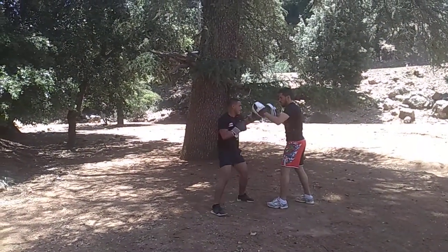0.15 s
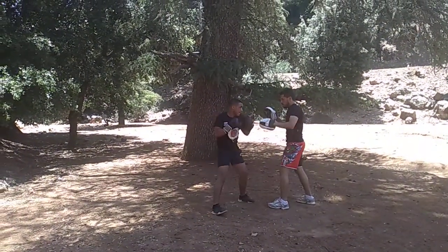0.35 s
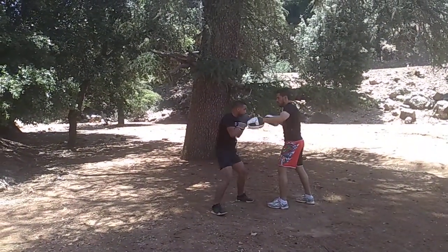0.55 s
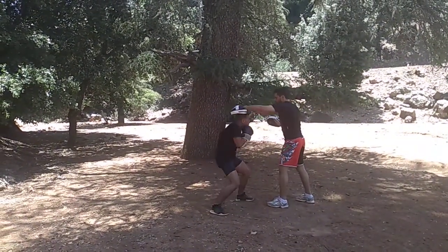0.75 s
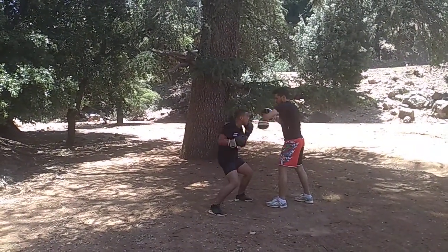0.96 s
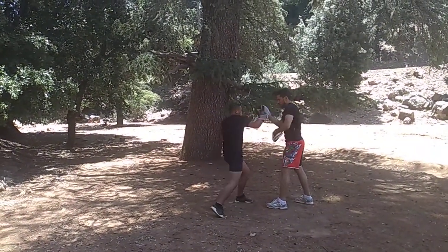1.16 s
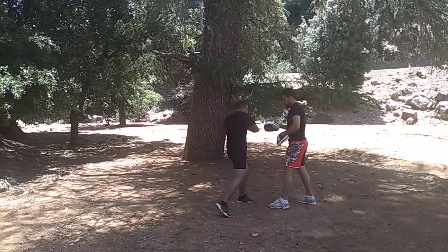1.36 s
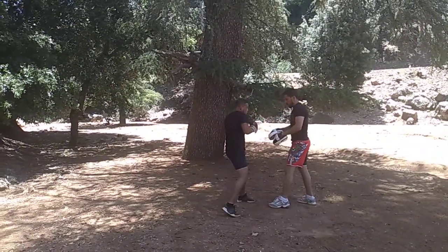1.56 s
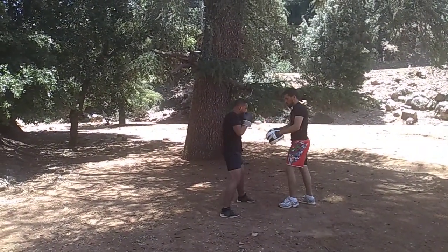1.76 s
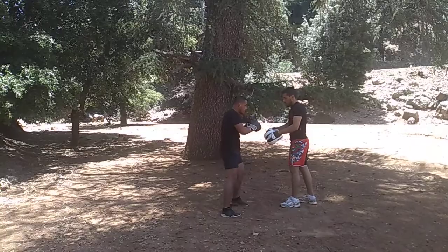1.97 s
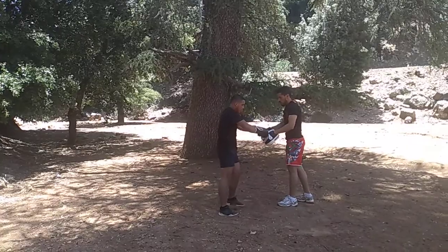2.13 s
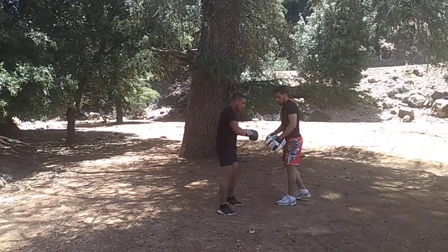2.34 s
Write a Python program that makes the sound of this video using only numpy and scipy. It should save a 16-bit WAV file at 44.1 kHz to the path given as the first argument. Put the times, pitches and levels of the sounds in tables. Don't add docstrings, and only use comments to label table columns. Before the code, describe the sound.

Boxing gloves smack padded mitts outdoors, sharp leather cracks with dull thumps echoing among trees

```python
import sys
import numpy as np
from scipy import signal
from scipy.fft import rfft, irfft, next_fast_len
from scipy.io import wavfile
from scipy.ndimage import uniform_filter1d, map_coordinates

SR = 44100
rng = np.random.default_rng(int(sys.argv[2]) if len(sys.argv) > 2 else 0)


def wrap_up_sound(samples):
    columns = np.atleast_2d(samples).T
    tamed = np.clip(columns, -1, 1)
    steps = np.round(tamed * 32767).astype(np.int16)
    wavfile.write(sys.argv[1], SR, steps)


def decibels_to_gain(level_db):
    exponent = np.asarray(level_db, float) / 20
    return 10 ** exponent


N = 105840


def unit(x):
    return x / np.sqrt(np.mean(x ** 2) + 1e-20)


def along(points, hz):
    f, v = np.transpose(points)
    return np.interp(np.log(hz + 1), np.log(f + 1), v)


def wobble(rate):
    knots = rng.standard_normal(int(N * rate / SR) + 4)
    return map_coordinates(knots, [np.arange(N) * rate / SR])


def filtered(x, response):
    m = next_fast_len(len(x) + SR // 2)
    return irfft(rfft(x, m) * response(np.fft.rfftfreq(m, 1 / SR)), m)[:len(x)]


def click(at):
    return 1. * (np.arange(SR) == at)


def coloured(size, gain_db):
    return unit(filtered(rng.standard_normal(size), lambda hz: decibels_to_gain(gain_db(hz))))


def add(track, s, sound):
    i = round(s * SR)
    part = track[max(i, 0):][:len(sound) + min(i, 0)]
    part += sound[max(-i, 0):][:len(part)]


def patchy(x, depth_db):
    z = signal.stft(x, nperseg=512)[2]
    field = uniform_filter1d(rng.standard_normal(z.shape), size=2, axis=0)
    field = uniform_filter1d(field, size=20, axis=1)
    return signal.istft(z * decibels_to_gain(depth_db * unit(field)), nperseg=512)[1][:len(x)]


def knock(modes):
    def ring(f):
        total = 0
        for k, (c, w, db) in enumerate(modes):
            total = total + (-1) ** k * decibels_to_gain(db) * 1j * f * w / (c * c - f * f + 1j * f * w)
        return total
    return -filtered(click(0), ring)


# f/Hz, time to fall 60 dB t/s
WOOD_T60 = [(100, 0.47), (300, 0.55), (1000, 0.58), (3000, 0.57), (8000, 0.24), (14000, 0.3)]
# f/Hz, level/dB
WOOD_TONE = [(80, 13.5), (300, -11), (1500, -3.5), (4000, -7.5), (8500, 6), (14000, -1.5)]
WOOD_RISE_S = 0.013
LATE_DB, LATE_LONGER, LATE_BASS_DB, LATE_BASS_HZ = -31, 3.4, 8.5, 180


def wood(x):
    hz, t, z = signal.stft(rng.standard_normal(len(x)), SR, nperseg=256)
    fall_db = -60 * t / along(WOOD_T60, hz)[:, None]
    late_db = LATE_DB + LATE_BASS_DB / (1 + (hz[:, None] / LATE_BASS_HZ) ** 4)
    near_and_far = decibels_to_gain(fall_db) + decibels_to_gain(late_db + fall_db / LATE_LONGER)
    z = z * decibels_to_gain(along(WOOD_TONE, hz))[:, None] * near_and_far
    tail = signal.istft(z, SR, nperseg=256)[1][:len(x)]
    tail = tail * (1 - np.exp(-(np.arange(len(tail)) / SR / WOOD_RISE_S) ** 2))
    return signal.fftconvolve(x, tail / np.linalg.norm(tail))[:len(x)]


# f/Hz, width/Hz, share lost
SOIL_DIPS = [(1120, 220, 0.6), (3040, 190, 0.71), (620, 92, 0.48)]


def soil(x):
    def dips(hz):
        gain = np.ones(len(hz))
        for centre, width, share in SOIL_DIPS:
            gain *= 1 - share * np.exp(-((hz - centre) / width) ** 2)
        return gain
    return filtered(x, dips)


# f/Hz, level/dB per Hz
RUSTLE = [(40, -19), (120, -11.5), (400, -15.5), (1200, -4.5), (2200, 3.5), (4500, -11.5), (6500, -26.5),
          (12500, -36.5)]
RUSTLE_DB, RUSTLE_TOP_HZ = -70.5, 12700
INSECT_HZ, INSECT_WIDTH_HZ, INSECT_DB = 9250, 800, -79


def air():
    far = coloured(N, lambda hz: along(RUSTLE, hz) - 25 * (hz > RUSTLE_TOP_HZ))
    hiss = coloured(N, lambda hz: np.maximum(-6 * ((hz - INSECT_HZ) / INSECT_WIDTH_HZ) ** 2, -60))
    rustle = decibels_to_gain(RUSTLE_DB + 0.78 * wobble(2.8)) * far
    insects = decibels_to_gain(INSECT_DB + wobble(8)) * hiss
    return patchy(rustle + insects, 3)


# t/s, length/s, first f/Hz, last f/Hz, level/dB
BIRD_NOTES = [(.743, .052, 2090, 2050, -62), (.763, .048, 6280, 6200, -65), (.84, .04, 3450, 2600, -72),
              (1.018, .14, 5800, 5400, -66), (1.168, .072, 6050, 5450, -64), (1.08, .16, 9250, 9250, -72),
              (1.12, .08, 9700, 9680, -76), (1.308, .04, 1860, 1820, -64), (1.35, .045, 3600, 2950, -66),
              (1.45, .055, 3400, 3620, -67), (1.65, .14, 2330, 2200, -67), (1.596, .078, 5780, 5000, -61),
              (1.712, .072, 5950, 5050, -61), (2.0, .04, 2020, 1900, -63), (2.178, .045, 2080, 2200, -60),
              (2.225, .035, 4000, 3200, -68), (2.258, .044, 2880, 2820, -67),
              (2.238, .028, 1850, 1600, -68)]
BEND, FADE_DB, NOTE_EDGE = 1.2, -7, .45
QUAVER_HZ, QUAVER_DB, HUSK = 30, 2, .3
BIRD_WET_DB = -5


def birds():
    out, quaver = np.zeros(N), wobble(120)
    for s, length, first_hz, last_hz, db in BIRD_NOTES:
        u = np.arange(round(length * SR)) / (length * SR)
        glide_hz = first_hz + (last_hz - first_hz) * u ** BEND
        hz = glide_hz + QUAVER_HZ * quaver[round(s * SR):][:len(u)]
        whistle = np.sin(2 * np.pi * np.cumsum(hz) / SR)
        add(out, s, decibels_to_gain(db + 7 + FADE_DB * u) * np.sin(np.pi * u) ** NOTE_EDGE * whistle)
    out *= decibels_to_gain(QUAVER_DB * wobble(70)) * (1 + HUSK * wobble(830))
    return out + decibels_to_gain(BIRD_WET_DB) * wood(out)


# f/Hz, level/dB per Hz
LITTER = [(200, -49.5), (450, -24), (870, -6.5), (1150, -14.5), (1500, -7), (2300, -8.5), (3000, -12.5),
          (4800, -7)]
OVER_TOP_DB, FABRIC_HZ, FABRIC_DB = -24, 11600, 6.5


def litter_db(hz, tilt_db, top_hz):
    swish_db = FABRIC_DB * np.exp(-((hz - FABRIC_HZ) / 900) ** 2)
    swish_db = swish_db - 4 * np.maximum(hz - FABRIC_HZ, 0) / 1000
    above_top = 1 / (1 + (top_hz / (hz + 1)) ** 24)
    return along(LITTER, hz) + tilt_db * np.log2(hz / 2500 + 0.15) + (OVER_TOP_DB + swish_db) * above_top


# t/s, length/s, level/dB, brightness/dB an octave, top f/Hz
SCUFFS = [(0.0, .11, -50.5, -1, 10600), (0.102, .11, -57, -4, 6850), (0.397, 0.17, -65, -7.5, 5500),
          (0.576, 0.19, -66.5, -4.5, 5800), (0.805, 0.054, -60, 1, 8650), (0.809, .12, -68.5, -5.5, 6160),
          (0.861, 0.14, -68, 3.5, 3770), (1.095, 0.068, -65, 2.5, 5880), (1.383, 0.16, -66, -1, 6100),
          (1.496, 0.077, -59, -3.5, 6030), (1.69, 0.25, -65, -3, 2895), (1.75, 0.19, -59.5, 1, 6270),
          (1.8, 0.11, -67, -1, 14300), (1.969, 0.16, -63, -4, 6100), (2.13, 0.24, -71.5, 2, 5000)]
SCUFF_ATTACK, SCUFF_RELEASE, SCUFF_SPAN = 0.19, 1, 2.5
GRIT_SHARE, GRIT_PER_S = 0.32, 1300
# t/s, peak level/dB
TWIGS = [
    (0.0954, -29),
    (0.8086, -38.5),
    (1.1006, -49),
    (1.1474, -49.5),
    (1.1608, -73.5),
    (1.5219, -43),
    (2.0219, -43),
    (2.149, -47),
    (2.2006, -62),
]
TWIG_DB, TWIG_T60_S, TWIG_TOP_HZ = -12, .04, 6000


def feet():
    out = np.zeros(N)
    for s, length, db, tilt_db, top_hz in SCUFFS:
        size = round(length * SR * SCUFF_SPAN)
        u = np.arange(size) / SR / length
        grit = (rng.random(size) < GRIT_PER_S / SR) * rng.standard_normal(size)
        drag = GRIT_SHARE * unit(grit) + (1 - GRIT_SHARE) * rng.standard_normal(size)
        drag = unit(filtered(drag, lambda hz: decibels_to_gain(litter_db(hz, tilt_db, top_hz))))
        release = np.exp(-(np.maximum(u - .6, 0) / SCUFF_RELEASE) ** 2 * 3)
        add(out, s, decibels_to_gain(db) * np.clip(u / SCUFF_ATTACK, 0, 1) * release * drag)
    out = patchy(out, 4) * decibels_to_gain(0.77 * wobble(25))
    t = np.arange(SR // 10) / SR
    for s, db in TWIGS:
        tick = coloured(len(t), lambda hz: litter_db(hz, 1.7, TWIG_TOP_HZ))
        add(out, s, decibels_to_gain(db + TWIG_DB - 60 * t / TWIG_T60_S) * tick)
    return out


# f/Hz, width/Hz, level/dB
ARM = [(75, 30, 1.5), (118, 100, 3), (179, 81, 2.5)]
# t/s, level/dB
PUSHES = [
    (-.045, 11.5),
    (.234, 20.5),
    (1.2412, 14),
]
ARM_WET_DB = -13


def arms():
    out, thud = np.zeros(N), knock(ARM)
    for s, db in PUSHES:
        add(out, s, decibels_to_gain(db) * (thud + decibels_to_gain(ARM_WET_DB) * wood(thud)))
    return out


# t/s, crack level/dB, crack length/s, thump level/dB, cup ring level/dB
CONTACTS = [
    (-.045, -22.5, 0.0074, -13.5, -35),
    (0.2338, -8, 0.0012, -12.5, -31.5),
    (.2352, -18.5, 0.0051, -38.5, -10),
    (1.2392, -41, .0015, -35, -60),
    (1.2413, -24, 0.003, -25.5, -32.5),
    (1.2445, -34, 0.0093, -24.5, -36),
    (1.2485, -29, 0.0037, -43.5, -46),
    (1.257, -38, 0.0015, -37.5, -69),
    (1.309, -45, 0.0012, -60, -67.5),
]
# f/Hz, level/dB per Hz
CRACK = [(400, -34.5), (900, -4.5), (2400, -5.5), (4500, -7), (6500, -7.5), (8400, -2.5), (10200, -13.5),
         (16000, -19.5)]
# f/Hz, width/Hz, level/dB
PAD = [(230, 60, -9.5), (411, 93, 0), (936, 380, -17.5)]
SNAP_DB, SNAP_S = -0.5, .00008
CUP_HZ, CUP_T60_S = 2320, 0.011
TRUNK_S, TRUNK_SPREAD_S, TRUNK_DB, TRUNK_THUMP_DB = .027, .004, -17.5, -6
WOOD_DB = -11.5


def punches():
    out, t = np.zeros(N), np.arange(SR) / SR
    pad = knock(PAD)
    even = filtered(click(60), lambda hz: decibels_to_gain(along(CRACK, hz)))
    v = t / SNAP_S
    dip = v * (2 - v) * np.exp(1 - v)
    for s, crack_db, length, thump_db, cup_db in CONTACTS:
        burst = np.exp(-(t / length) ** 1.4) * coloured(SR, lambda hz: along(CRACK, hz))
        cup = decibels_to_gain(cup_db - 60 * t / CUP_T60_S) * np.sin(2 * np.pi * CUP_HZ * t)
        crack = decibels_to_gain(crack_db) * burst - decibels_to_gain(crack_db + SNAP_DB) * dip + cup
        thump = decibels_to_gain(thump_db + 34) * pad
        spread = even * np.linalg.norm(crack) / np.linalg.norm(even)
        smear = rng.standard_normal(SR) * np.exp(-.5 * ((t - TRUNK_S) / TRUNK_SPREAD_S) ** 2)
        back = decibels_to_gain(TRUNK_DB) * spread + decibels_to_gain(TRUNK_THUMP_DB) * thump
        echo = signal.fftconvolve(back, smear / np.linalg.norm(smear))[:SR]
        add(out, s, crack + thump + echo + decibels_to_gain(WOOD_DB) * wood(spread + thump))
    return out


def scene():
    return (soil(air() + feet()) + birds() + arms() + punches())[None]


def roll_off(x):
    return signal.sosfilt(signal.butter(12, 16370, fs=SR, output="sos"), x)


def record(dry):
    def microphone(hz):
        return (1j * hz / (50 + 1j * hz)) ** 4 / (1 + (hz / 16100) ** 60)
    return roll_off(filtered(dry[0], microphone)[None])


dry = scene()
out = record(dry)
wrap_up_sound(out)
```